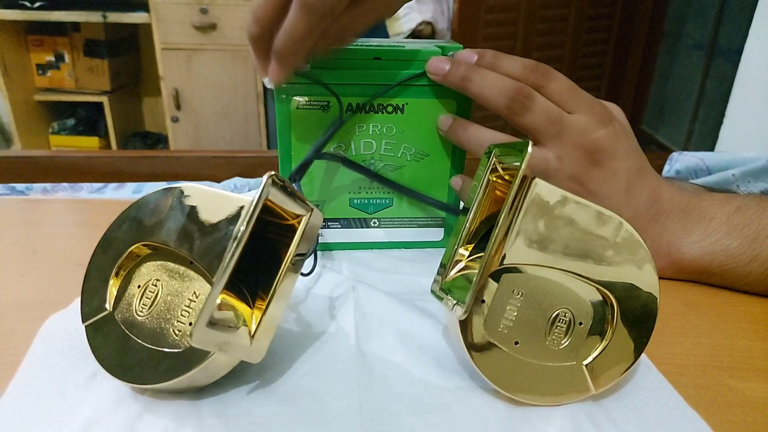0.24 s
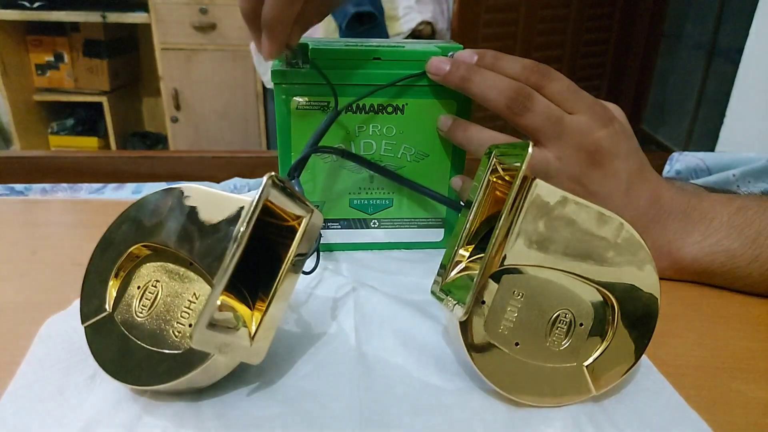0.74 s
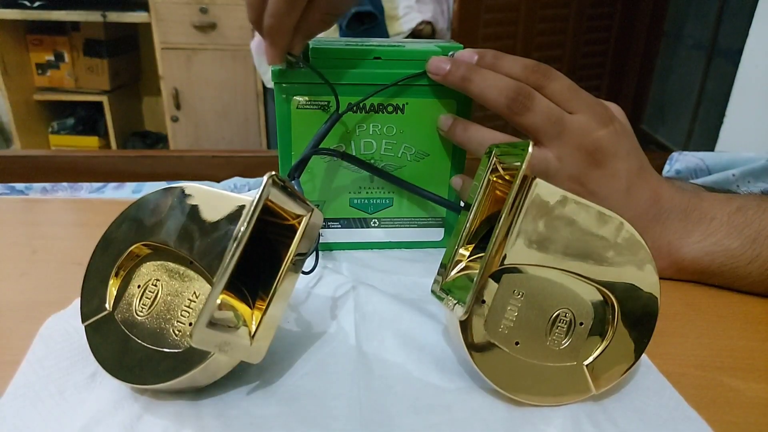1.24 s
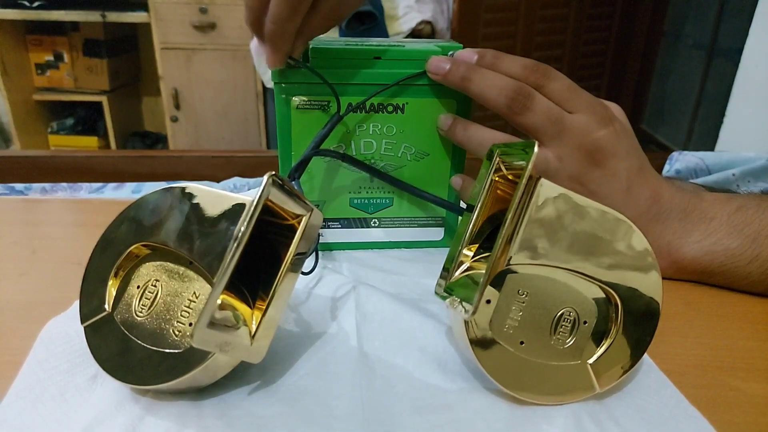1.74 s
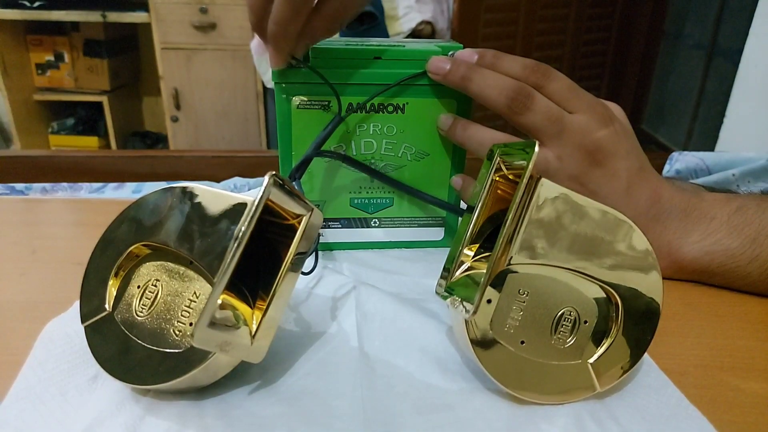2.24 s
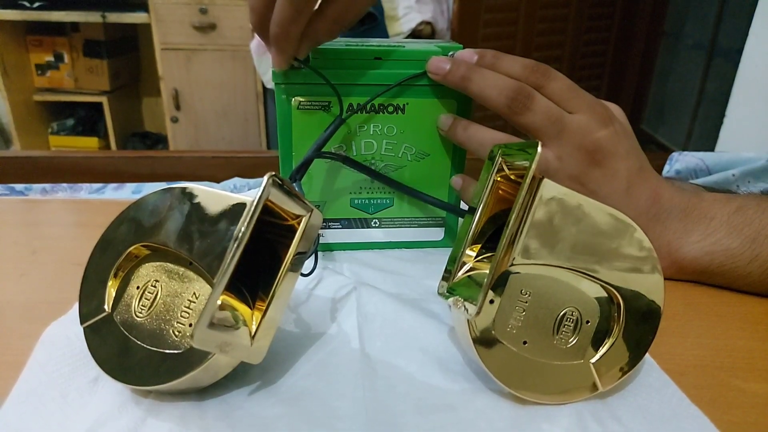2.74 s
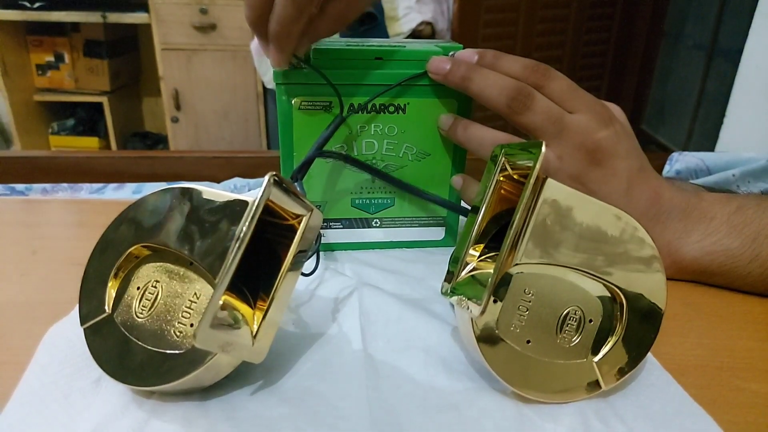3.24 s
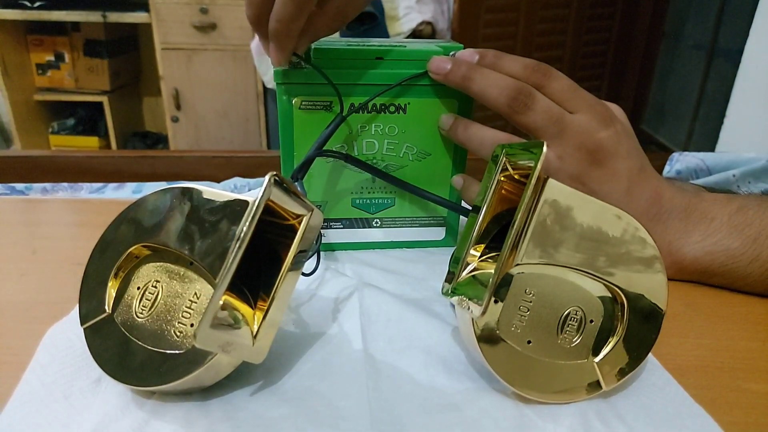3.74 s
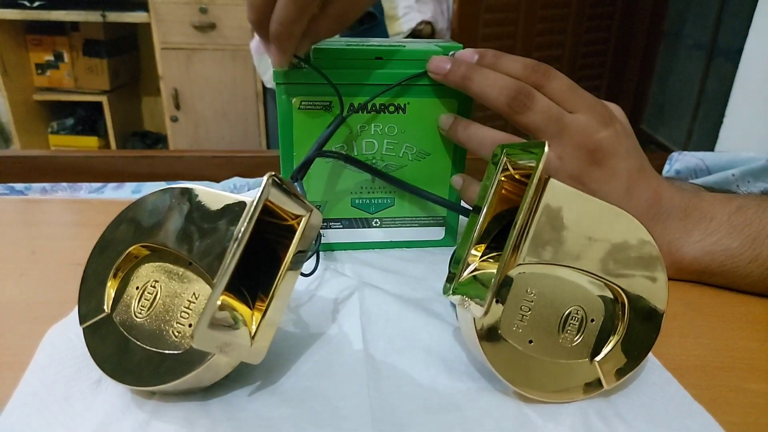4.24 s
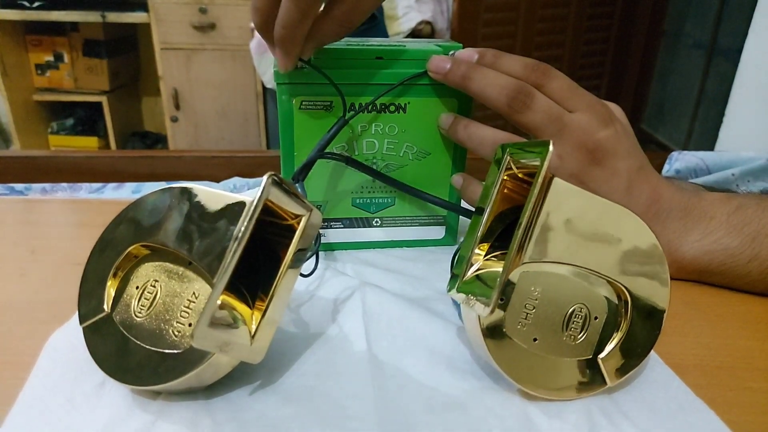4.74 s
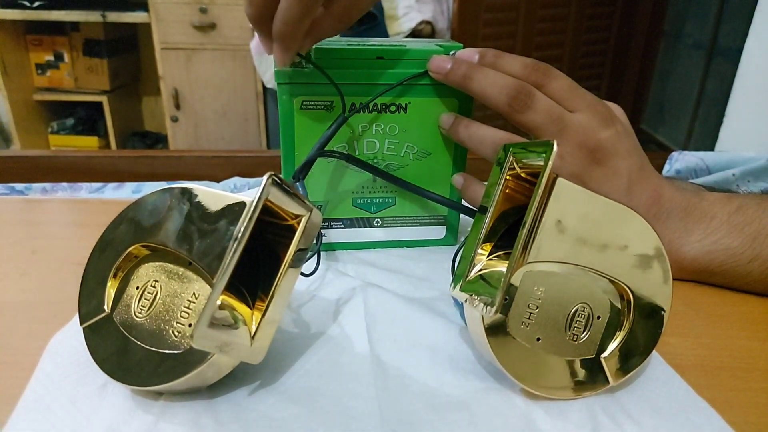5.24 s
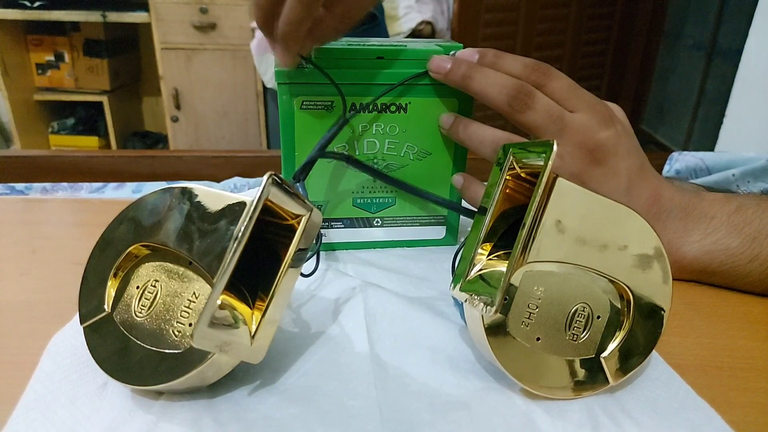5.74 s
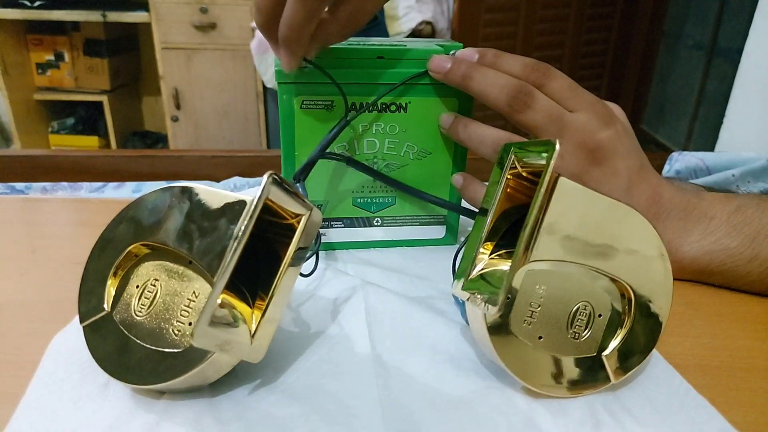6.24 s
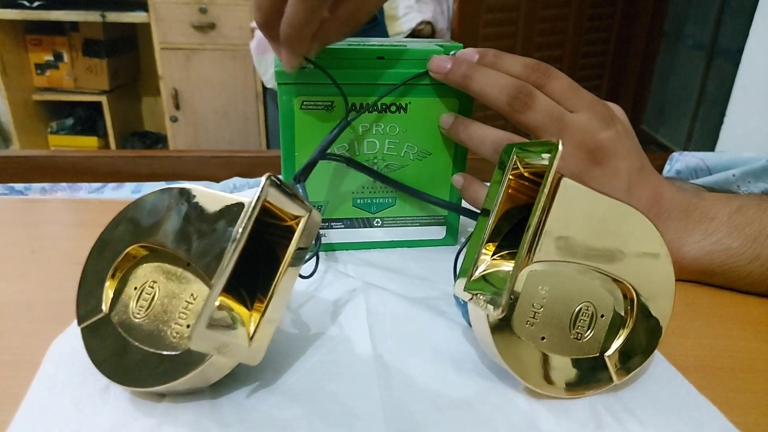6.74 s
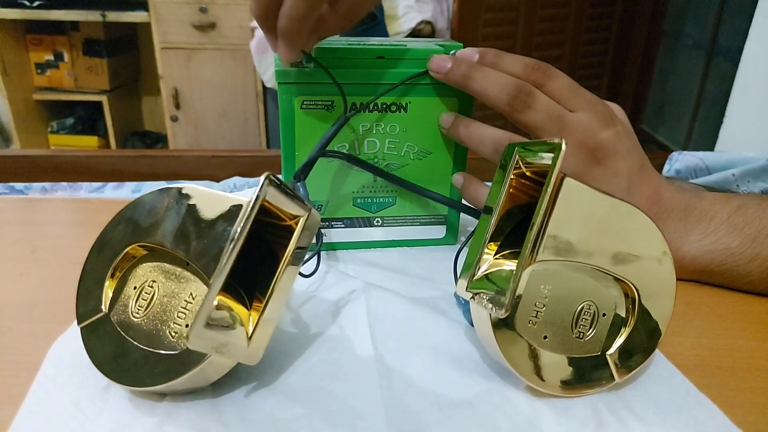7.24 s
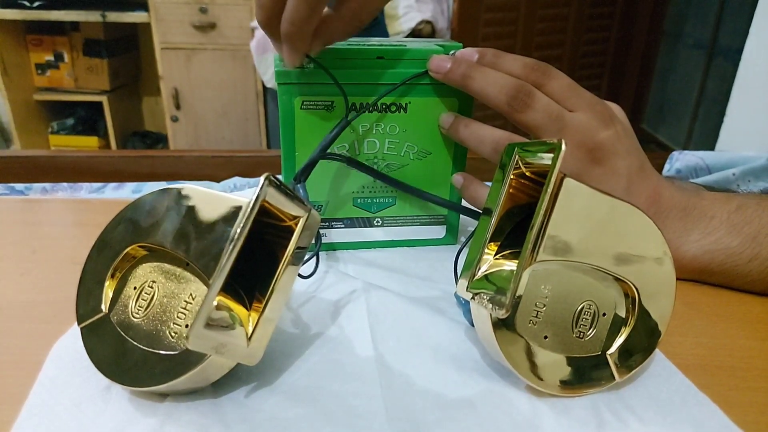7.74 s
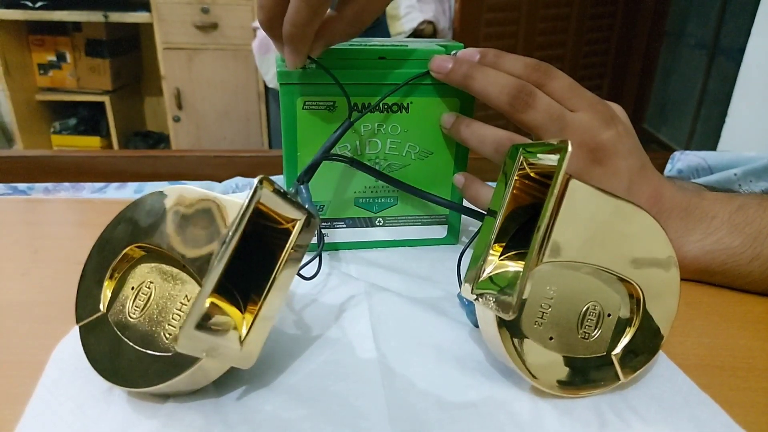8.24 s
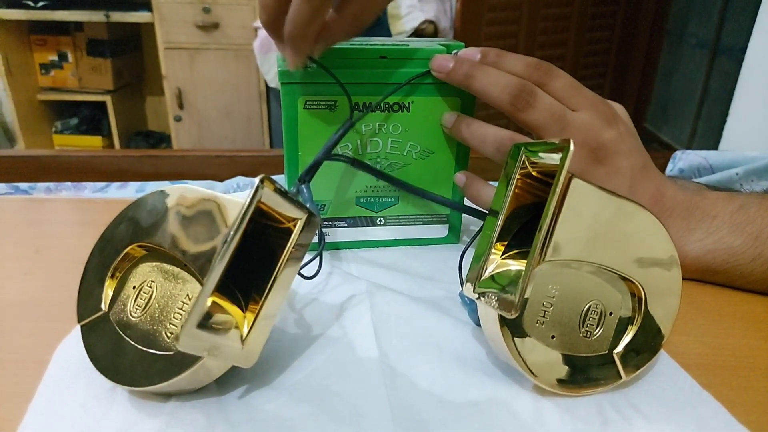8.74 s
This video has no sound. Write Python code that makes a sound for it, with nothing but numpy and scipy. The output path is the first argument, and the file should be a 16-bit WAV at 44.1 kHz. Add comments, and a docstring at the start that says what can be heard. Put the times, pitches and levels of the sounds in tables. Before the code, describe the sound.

A wire touched to a battery sounds two electric snail horns about a third apart, very close and distorted in a hard bare room. After tiny contact clicks come three blasts, a pause, a short toot and a long blast, then quick toots mixed with longer honks. Each starts abruptly, with air hiss and low buzz, and stops into short reverberation, with occasional dull bumps.

```python
"""In a bare room, two electric snail horns about a third apart sound twelve toots and blasts.
A wire touched to a battery kicks their diaphragms into swing; air hisses along, and the room rings on.
They overload the close stereo microphone: it bends the wave and adds a low buzz of difference tones.
Dull thumps come with some blasts, and faint twitches come before the first one.
The gain control ducks the low room rumble under the blasts and lets it swell back in the pauses."""
import sys
import numpy as np
from scipy import signal
from scipy.fft import rfft, irfft, next_fast_len
from scipy.io import wavfile
from scipy.ndimage import uniform_filter1d, map_coordinates

SR = 44100
rng = np.random.default_rng(int(sys.argv[2]) if len(sys.argv) > 2 else 0)


def write(x):
    x = np.atleast_2d(x).T
    wavfile.write(sys.argv[1], SR, np.round(np.clip(x, -1, 1) * 32767).astype(np.int16))


N = 396900  # samples: 9 s

TOP_HZ = 15750  # upper limit of the horns' harmonics and of the finished sound
BUILD_UP_S = 0.02  # time rendered ahead of each contact, for the first small strokes


def amp(db):
    """Turn decibels into a plain gain factor."""
    return 10 ** (np.asarray(db) / 20)


def unit(x):
    """Scale a sound to an average (rms) strength of 1."""
    return x / np.sqrt(np.mean(x ** 2) + 1e-20)


def along(points, hz):
    """Read a curve of (f/Hz, value) points, with straight lines on a log frequency axis."""
    f, v = np.transpose(points)
    return np.interp(np.log(hz + 1), np.log(f + 1), v)


def wobble(rate, size):
    """Make a smooth random curve with rate knots a second, size samples long."""
    knots = rng.standard_normal(int(size * rate / SR) + 4)
    return map_coordinates(knots, [np.arange(size) * rate / SR])


def filtered(x, response):
    """Multiply each frequency in x by the gain that response gives for it."""
    padded = next_fast_len(N + SR // 2)
    spectrum = rfft(x, padded) * response(np.fft.rfftfreq(padded, 1 / SR))
    return irfft(spectrum, padded)[..., :N]


def noise(spectrum, width):
    """Colour stereo noise to rms 1; width is the side (left-right difference) over the middle."""
    mid, side = filtered(rng.standard_normal((2, N)), lambda hz: amp(along(spectrum, hz)))
    return unit(np.array([mid + width * side, mid - width * side]))


def add(track, s, sound):
    """Mix a sound into a track, starting at s seconds."""
    part = track[..., round(s * SR):][..., :sound.shape[-1]]
    part += sound[..., :part.shape[-1]]


def background():
    """Steady room rumble, made of coloured noise, with a low hum that wavers in pitch and level."""
    # colour of the rumble: (f/Hz, relative level/dB per Hz)
    rumble_colour = [(15, -48.5), (25, -18.5), (48, -9.5), (98, -28), (146, -11.5), (224, -20), (335, -22),
                     (415, -23), (543, -29), (1030, -36), (1120, -41.5), (1910, -40.5), (3000, -44),
                     (4000, -54), (5600, -48), (8000, -60.5), (15000, -65.5)]
    rumble_db, hum_db = -67, -66  # levels ahead of the microphone
    t = np.arange(N) / SR
    hum = np.sin(2 * np.pi * 147.5 * t + 0.5 * wobble(6.2, size=N))
    hum = hum * amp(1.5 * wobble(2.3, size=N))
    return amp(rumble_db) * noise(rumble_colour, width=0.46) + amp(hum_db) * hum


def room(x):
    """A bare room answers: near walls first, then a tail in which each frequency dies at its own speed."""
    # time in which the tail alone falls by 60 dB: (f/Hz, time/s)
    decay_times = [(150, 1), (500, 0.67), (1500, 0.78), (3000, 0.63), (6000, 0.72), (14000, 0.39)]
    hz, t, z = signal.stft(rng.standard_normal((2, SR)), SR, nperseg=256)
    near_walls = amp(17 * np.exp(-t / 0.13)) * (1 - np.exp(-t / 0.022))
    decay = amp(-60 * t / along(decay_times, hz)[:, None])
    tail = signal.istft(z * decay * near_walls, SR, nperseg=256)[1]
    echo = signal.fftconvolve(x, tail / np.linalg.norm(tail[0]), axes=1)[:, :N]
    # long-lived bands are turned down so that every band returns with much the same energy
    return filtered(echo, lambda f: np.sqrt(along(decay_times, 1400) / along(decay_times, f)))


def thumps():
    """Each dull thump is a short swell of low noise that rises and falls like half a sine wave."""
    # mostly as a blast starts or ends: (start t/s, length/s, level/dB)
    thump_list = [(1.712, 0.072, -32.5), (2.225, 0.1, -23), (4.94, 0.092, -25), (5.81, .1, -22),
                  (6.12, .13, -25), (6.743, 0.13, -28.5), (6.99, 0.15, -25.5), (7.633, 0.073, -27),
                  (8.122, .12, -28.5)]
    # colour of the thumps: (f/Hz, relative level/dB per Hz)
    thump_colour = [(15, -13), (40, -3.5), (75, -1), (110, -6.5), (200, -23), (600, -68), (2000, -120)]
    envelope = np.zeros(N)
    for s, length, db in thump_list:
        swell = np.sin(np.linspace(0, np.pi, int(length * SR)))
        add(envelope, s, amp(db) * swell)
    return envelope * noise(thump_colour, width=0.7)


def grazes():
    """The wire only grazes the terminal: a jolt of current sparks and makes the diaphragms ring briefly."""
    # the twitches: (t/s, level/dB)
    graze_list = [(.806, -54.5), (.866, -64), (1.266, -23.5)]
    track, t = np.zeros((2, N)), np.arange(SR // 4) / SR
    ring = np.sin(2 * np.pi * 505 * t) * amp(-60 * t / 0.063)
    ring += 0.097 * np.sin(2 * np.pi * 1500 * t) * amp(-60 * t / 0.065)
    for s, db in graze_list:
        spark = amp(-25.5 - 60 * t / 0.06) * rng.standard_normal((2, len(t)))
        add(track, s, amp(db) * (ring + spark) * (1 - np.exp(-t / 0.0009)))
    return track


def air(tone):
    """Air hisses in the flares: noise that gets louder and softer in step with the horns' swing."""
    # colour of the hiss: (f/Hz, relative level/dB per Hz)
    air_colour = [(30, -18), (60, -12), (110, -11), (450, 2), (900, -6), (2000, -9), (3500, -13.5),
                  (5000, -18), (6500, -21), (8000, -40), (10000, -25.5), (13000, -21), (15700, -22.5)]
    # square root of the smoothed power: the strength of the swing
    swing = np.sqrt(np.abs(uniform_filter1d(np.mean(tone ** 2, axis=0), size=40)))
    return amp(-14.5 + 2.5 * wobble(40, size=N)) * swing * noise(air_colour, width=0.41)


def cycle(orders, harmonics, flare, turns):
    """Add up harmonics into one stereo wave cycle, then read it at a phase counted in turns."""
    left_db, right_db, lead = harmonics  # lead: how far the left is ahead, in radians
    grid = np.arange(2 ** 10) / 2 ** 10
    # the flare delays the overtones and spreads each pulse
    angle = 2 * np.pi * grid[:, None] * orders - flare * orders ** 2
    ears = [np.cos(angle + lead / 2) @ amp(left_db), np.cos(angle - lead / 2) @ amp(right_db)]
    return np.sqrt(2) * np.array([np.interp(turns, grid, ear, period=1) for ear in ears])


def toot(length, hz, harmonics, edge, jitter, flutter_db, scoop, sag, coast, flare, kick_db, free_db):
    """One horn, fed for length seconds: a contact breaker keeps the diaphragm slamming at its own pitch."""
    ring_out_s = 0.25  # added to the length; it holds the build-up and the ringing after release
    bloom_s_per_khz = 0.0046  # each overtone arrives later the higher it is
    t = np.arange(int((length + ring_out_s) * SR)) / SR - BUILD_UP_S
    fed, released = np.maximum(t, 0), np.maximum(t - length, 0)
    free = 1 - np.exp(-released / 0.0045)
    # the pitch starts flat, wavers with the breaker, and drops when the diaphragm swings free
    bend = -scoop * np.exp(-fed / 0.014) - sag * free
    waver = jitter * (wobble(170, size=len(t)) + 0.38 * wobble(16, size=len(t)))
    turns = np.cumsum(hz * (1 + bend + waver)) / SR

    def swing(late, rise, fall):
        """Grow around late seconds after contact and die away after release."""
        return np.exp(-released / fall) * (1 + np.tanh((t - late) / rise)) / 2

    orders, columns = np.arange(1, int(TOP_HZ / hz) + 1), np.transpose(harmonics)
    # the fundamental has its own level while the diaphragm is not yet, or no longer, slamming
    fundamental = cycle(orders[:1], columns[:, :1], flare, turns) * swing(0.0053, 0.0023, coast)
    fundamental *= amp(kick_db * np.exp(-fed / 0.013) + free_db * free - 2.5)
    # once free, diaphragm and air column trade energy, so the note dies in lumps
    fundamental *= np.cos(np.pi * released / 0.064)

    # overtones need a wide swing and are the first to go
    overtones = 0
    for k in range(1, len(harmonics)):
        late = 0.0029 + bloom_s_per_khz * orders[k] * hz / 1000
        overtone = cycle(orders[[k]], columns[:, [k]], flare, turns)
        overtones = overtones + overtone * swing(late, 0.0049, 0.0069)

    # the rasp is all the harmonics above the listed ones
    high = orders[len(harmonics):]
    edge_db = along(edge, high * hz)
    rasp = cycle(high, (edge_db, edge_db - 2.0, high * hz / 7000), flare, turns)
    rasp = rasp * swing(0.012, 0.01, 0.0088)

    # no two strokes are equally hard
    strokes = amp(flutter_db * (wobble(300, size=len(t)) + 1.81 * wobble(40, size=len(t))))
    return strokes * (fundamental + overtones + rasp)


def horns():
    """Both horns share the wire and sound together; the pitch of the low one wavers more."""
    # wire on the battery: (on t/s, off t/s, high horn gain/dB, low horn gain/dB,
    # low horn pitch f/Hz, extra rasp/dB)
    blasts = [(1.275, 1.755, 4.5, 8.5, 424, 2), (2.227, 2.432, 2, 5, 422.9, 0),
              (2.628, 3.18, 2.5, 3.5, 423.0, 0), (3.978, 4.174, 0.5, 1.5, 423.7, 0.5),
              (4.334, 5.009, 2, 2.5, 424.9, -1), (5.807, 5.893, 2, 4, 425.4, -0.5),
              (6.118, 6.475, 3.5, 5.5, 423.9, 0.5), (6.707, 6.838, 0.5, 2, 424, 0),
              (6.981, 7.13, 2, 4.5, 425, 2), (7.632, 8.317, 3.5, 5.5, 424.7, 1.5),
              (8.678, 8.798, 3.5, 5.5, 424.5, 1.5), (8.953, 9.100, 4, 5.5, 425.3, 0)]
    # first eight harmonics before the blast's gain: (left level/dB, right level/dB, left lead/rad)
    low_harmonics = [(-24, -23.5, 0.8), (-25.5, -26, 1.7), (-24, -20.5, 0.71), (-24.5, -17, 1.7),
                     (-29.5, -31.5, 1.35), (-31, -38.5, 1.26), (-31.5, -35.5, 4), (-44, -42, -3.5)]
    high_harmonics = [(-22.5, -20.5, 1.57), (-18.5, -20, 0.63), (-18.5, -30, 2.45), (-25.5, -16, 2.7),
                      (-21, -23, 1.7), (-18, -23, 2.1), (-33, -37, 2.8), (-34.5, -29.5, 3.7)]
    # their higher harmonics, before the blast's gain and extra rasp: (f/Hz, level of each/dB)
    low_edge = [(3800, -44.5), (5000, -46), (6400, -62), (8000, -67), (11000, -69.5), (15500, -62)]
    high_edge = [(4600, -39.5), (5200, -45.5), (5700, -38.5), (6700, -42.5), (7250, -44.5), (7800, -35.5),
                 (8300, -45.5), (9300, -40), (10500, -55.5), (12400, -44.5), (14500, -49.5), (15600, -54)]
    high_hz = 517.5  # the high horn keeps the same note from blast to blast
    tone = np.zeros((2, N))
    for on, off, high_db, low_db, low_hz, rasp_db in blasts:
        low_rasp = [(hz, level + rasp_db) for hz, level in low_edge]
        high_rasp = [(hz, level + rasp_db) for hz, level in high_edge]
        low = toot(off - on, low_hz, low_harmonics, low_rasp, jitter=0.0033, flutter_db=1.26,
                   scoop=0.03966, sag=0.024, coast=0.029, flare=0.3515, kick_db=8.0, free_db=-4.5)
        high = toot(off - on, high_hz, high_harmonics, high_rasp, jitter=0.00078, flutter_db=1.04,
                    scoop=0.02403, sag=0.012, coast=0.036, flare=0.7, kick_db=19.5, free_db=10.0)
        add(tone, on - BUILD_UP_S, amp(low_db) * low + amp(high_db) * high)
    return tone * amp([[0.4], [-0.4]])  # left a little louder than right


def scene():
    """Mix the horns close by with their hiss and thumps, and the room behind them."""
    tone = horns()
    direct = tone + grazes()
    return direct + air(tone) + thumps() + amp(-10.5) * room(direct) + background()


def overload(x, push, pull, knee):
    """The microphone saturates sooner on one side of the wave than on the other."""
    top = np.where(x > 0, push, pull)
    return x / (1 + np.abs(x / top) ** knee) ** (1 / knee)


def gain_control(x):
    """Blasts turn the gain far down; in the pauses it creeps back and the room's rumble swells."""
    limit_db, opening_cut_db = -9.5, 11  # level it holds; it opens already a little turned down
    attack_db_per_s, look_ahead_s, recover_s = 646.5, 0.0079, 1.25
    t = np.arange(N) / SR
    power = np.abs(uniform_filter1d(np.mean(x ** 2, axis=0), size=400))
    level_db = 10 * np.log10(power + 1e-12)
    excess_db = np.interp(t + look_ahead_s, t, level_db) - limit_db
    # the largest cut so far, shrinking steadily as it recovers
    recovery, ramp = np.exp(-t / recover_s), attack_db_per_s * t
    wanted_db = recovery * np.maximum.accumulate(np.maximum(excess_db / recovery, opening_cut_db))
    # the cut can only grow so fast, so the first blast overshoots
    cut_db = np.minimum.accumulate(wanted_db - ramp) + ramp
    return x * amp(-cut_db)


def record(dry):
    """Apply the overloaded microphone, its colour, gain control, full scale and the band limit."""
    # difference tones of the overloaded microphone: (f/Hz, gain/dB)
    buzz_colour = [(20, -23.5), (50, -20), (100, -4), (180, -2.5), (290, 3), (420, -23.5), (700, -12.5),
                   (1400, -22.5), (4000, -37)]
    # colour of the microphone: (f/Hz, gain/dB)
    mic_colour = [(25, -14), (60, 2.5), (120, 3.5), (300, 1), (600, 2.5), (3000, -1), (5800, 2), (7300, -4),
                  (9500, -5), (13000, 1.5), (15700, -2.5)]
    bent = overload(dry, push=0.68, pull=1.14, knee=4.2)
    # squaring beats the two horns' harmonics against each other into a low buzz
    buzz = filtered(bent ** 2, lambda hz: amp(along(buzz_colour, hz)))
    sound = filtered(bent - amp(3) * buzz, lambda hz: amp(along(mic_colour, hz)))
    sound = gain_control(amp(22.5) * sound)
    return filtered(np.clip(sound, -1, 1), lambda hz: (1 - np.tanh((hz - TOP_HZ) / 60)) / 2)


dry = scene()
out = record(dry)
write(out)
```